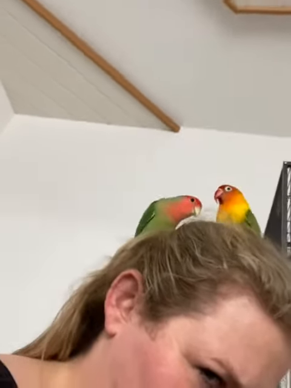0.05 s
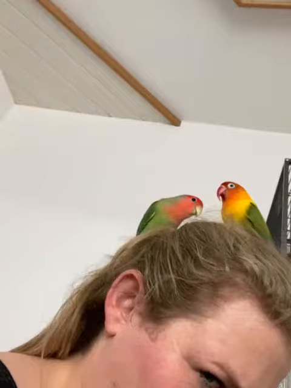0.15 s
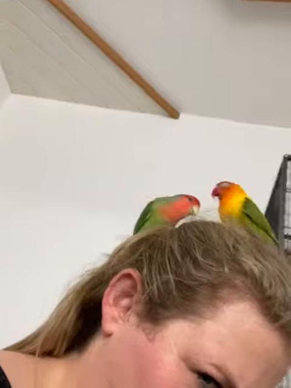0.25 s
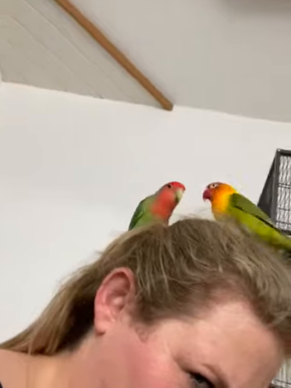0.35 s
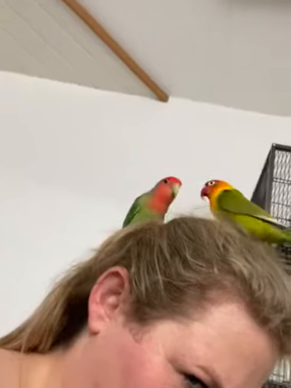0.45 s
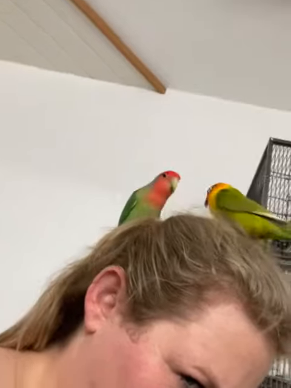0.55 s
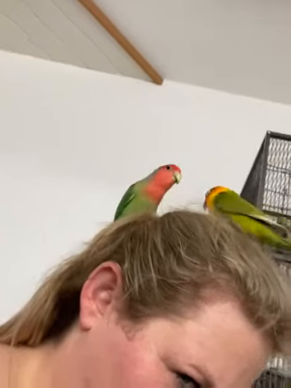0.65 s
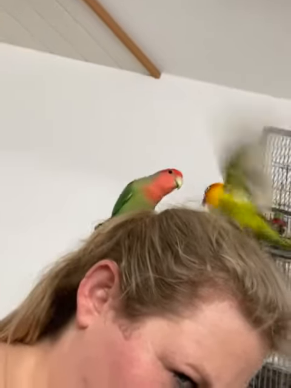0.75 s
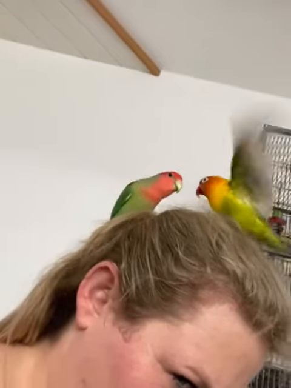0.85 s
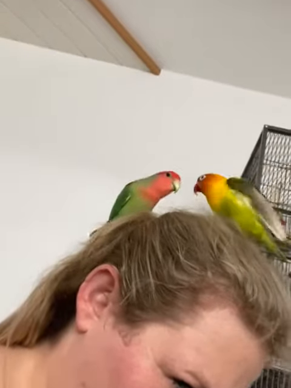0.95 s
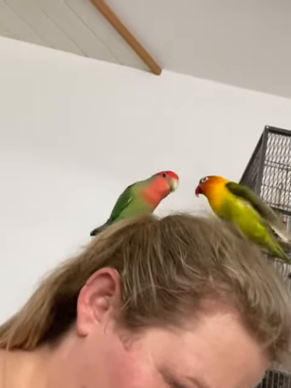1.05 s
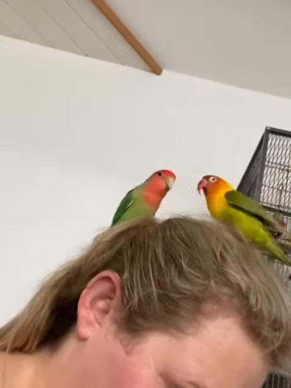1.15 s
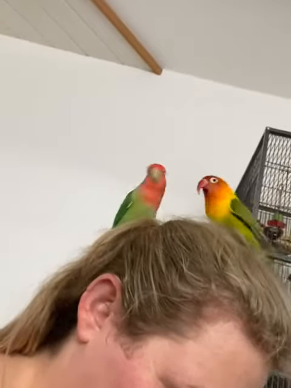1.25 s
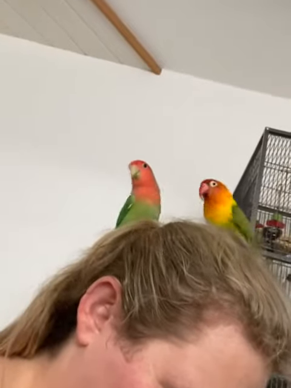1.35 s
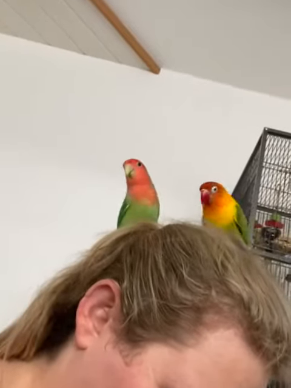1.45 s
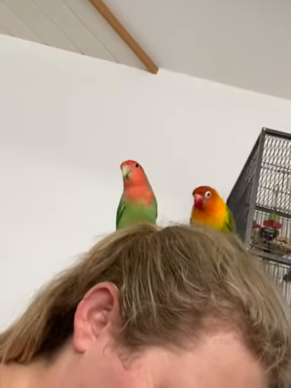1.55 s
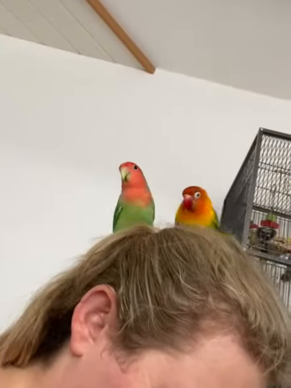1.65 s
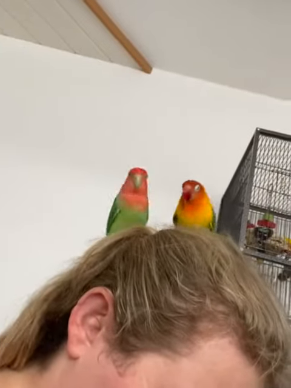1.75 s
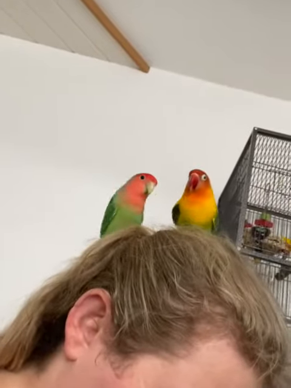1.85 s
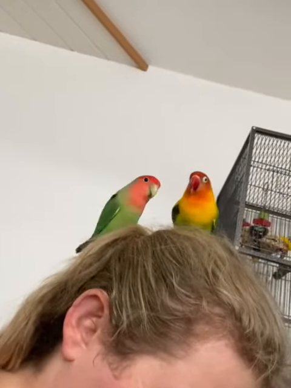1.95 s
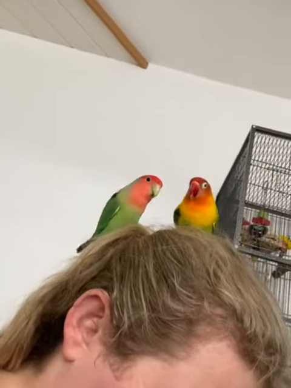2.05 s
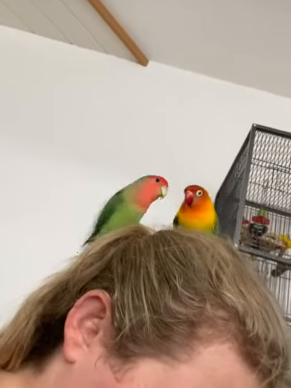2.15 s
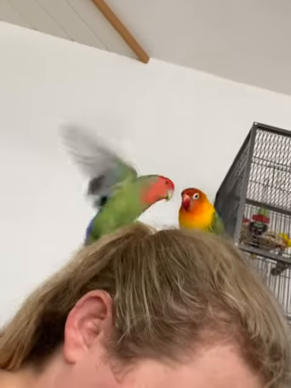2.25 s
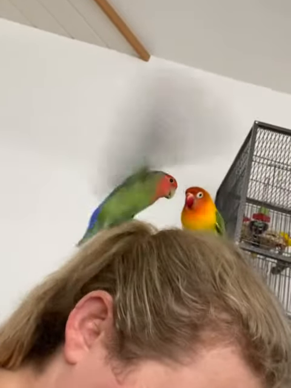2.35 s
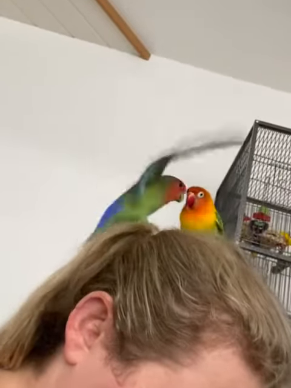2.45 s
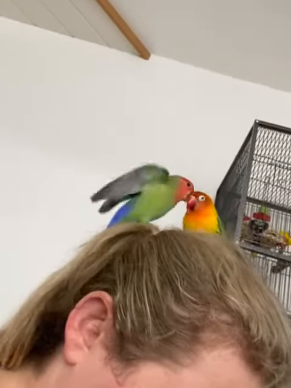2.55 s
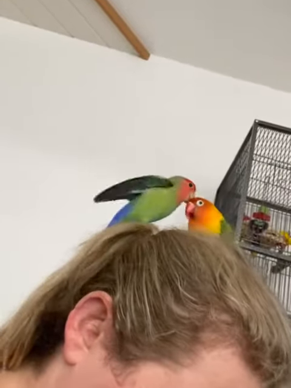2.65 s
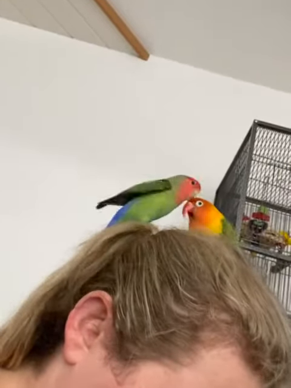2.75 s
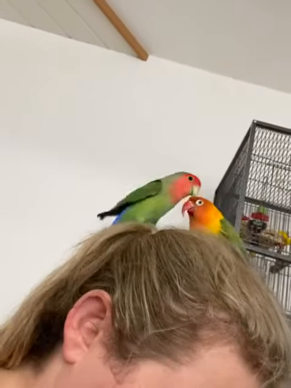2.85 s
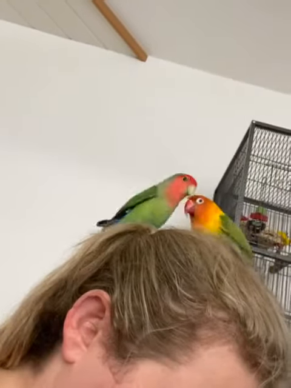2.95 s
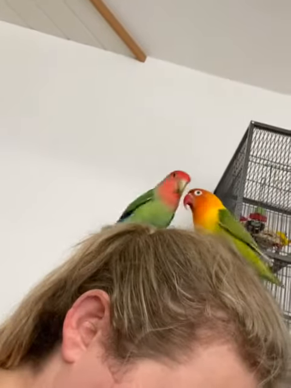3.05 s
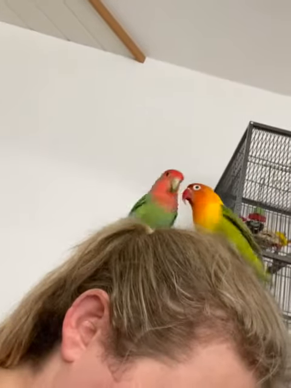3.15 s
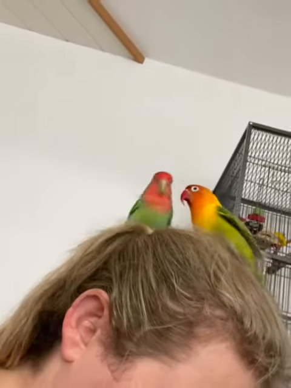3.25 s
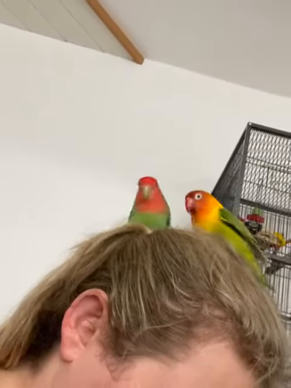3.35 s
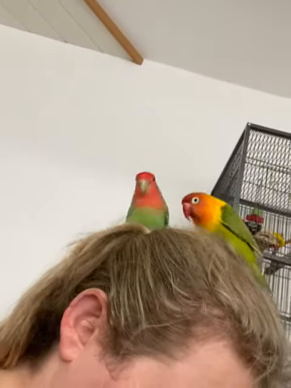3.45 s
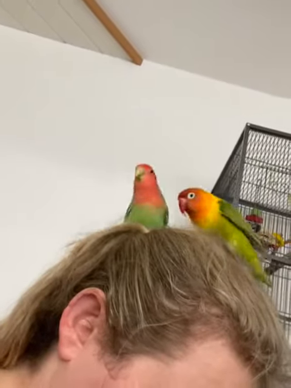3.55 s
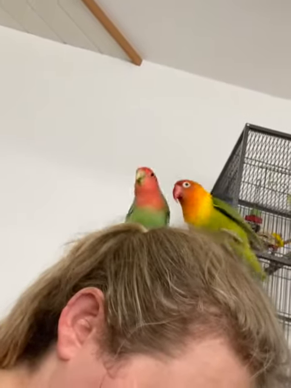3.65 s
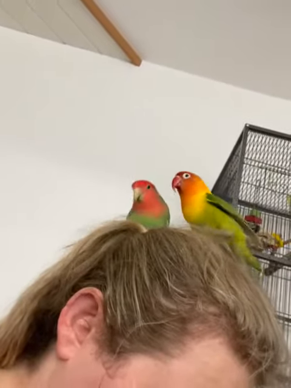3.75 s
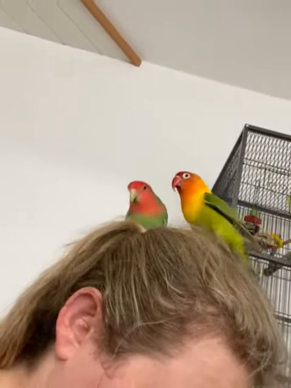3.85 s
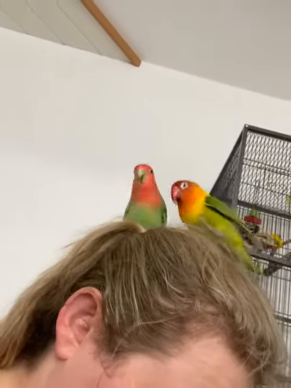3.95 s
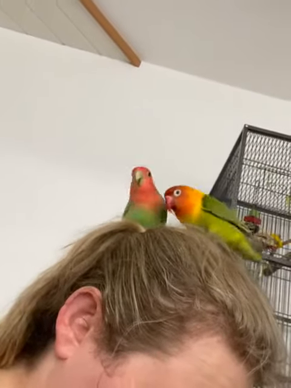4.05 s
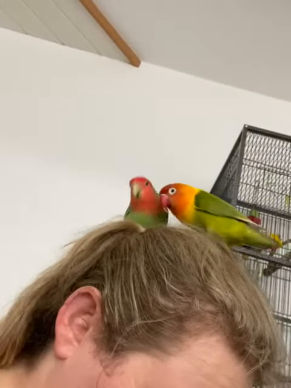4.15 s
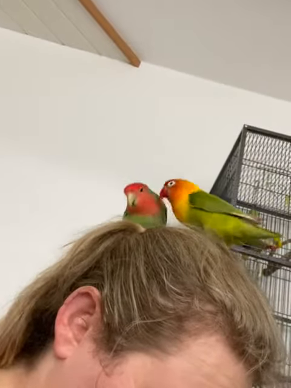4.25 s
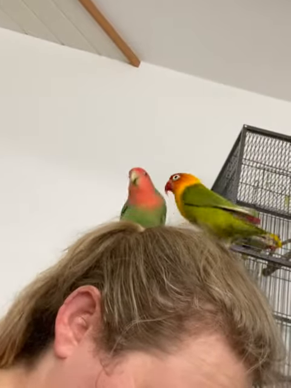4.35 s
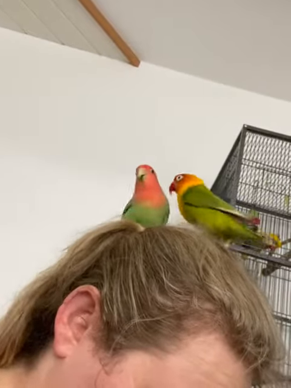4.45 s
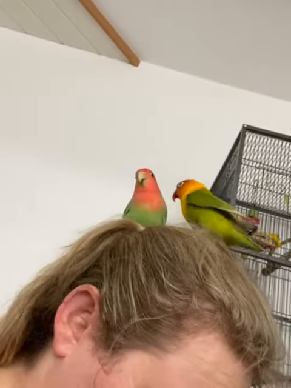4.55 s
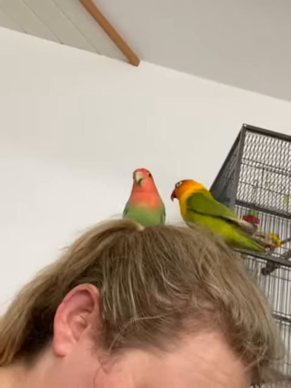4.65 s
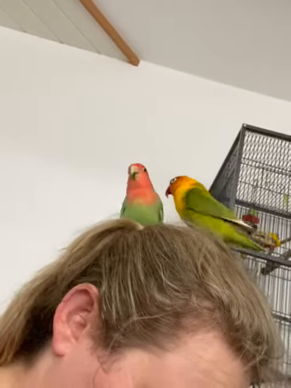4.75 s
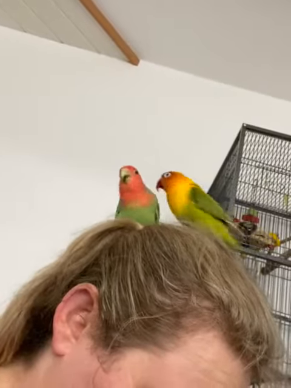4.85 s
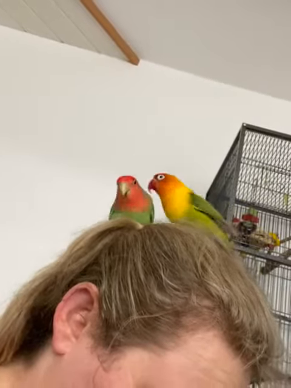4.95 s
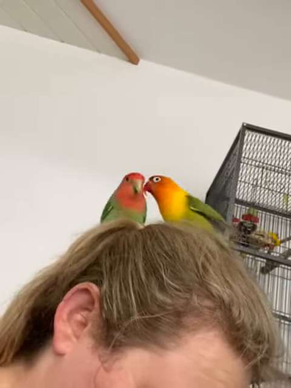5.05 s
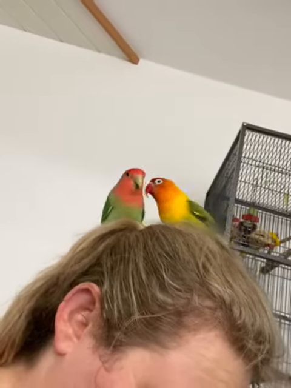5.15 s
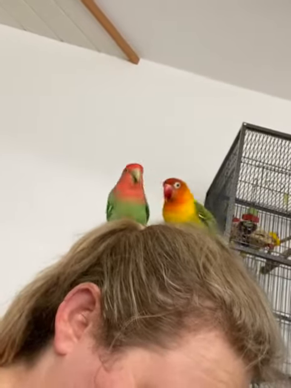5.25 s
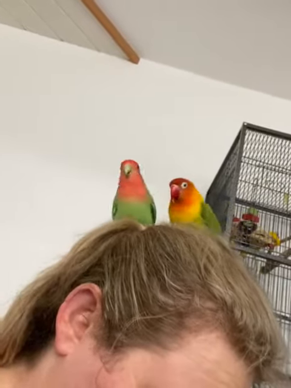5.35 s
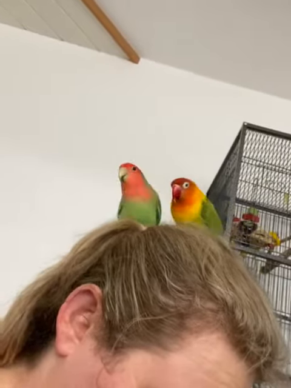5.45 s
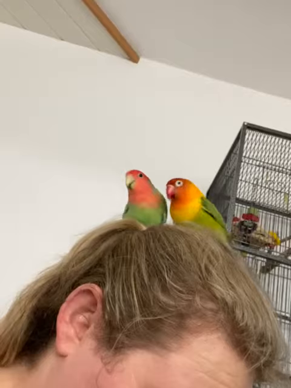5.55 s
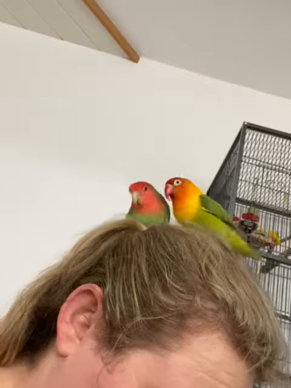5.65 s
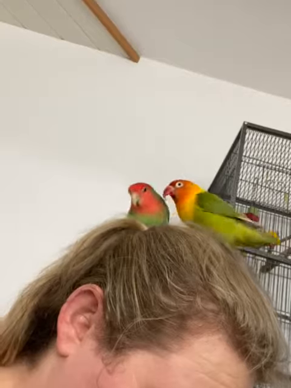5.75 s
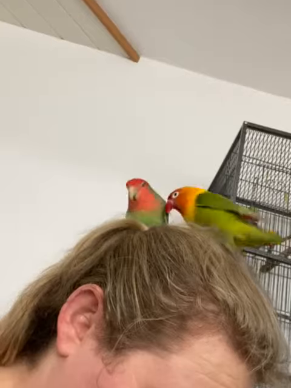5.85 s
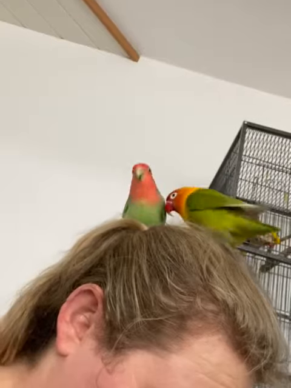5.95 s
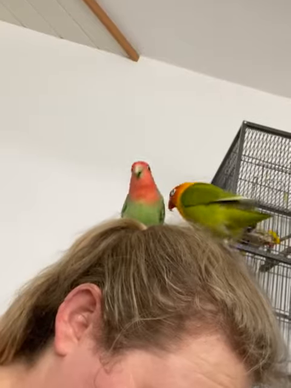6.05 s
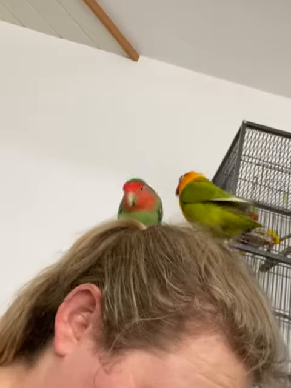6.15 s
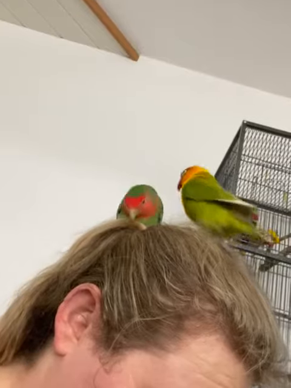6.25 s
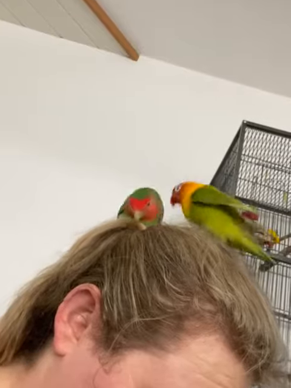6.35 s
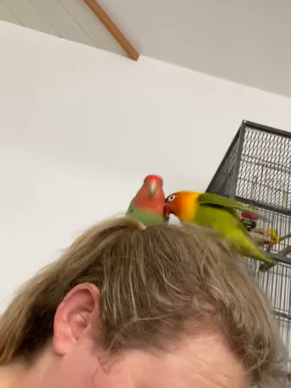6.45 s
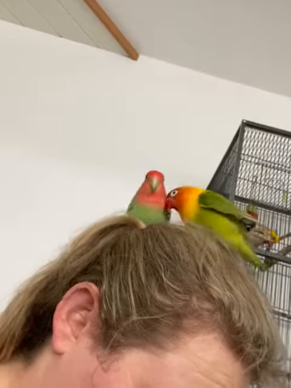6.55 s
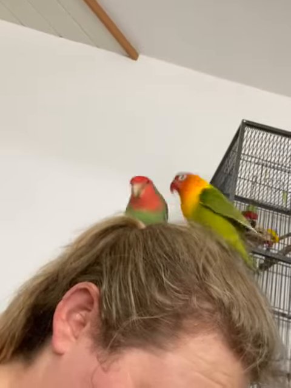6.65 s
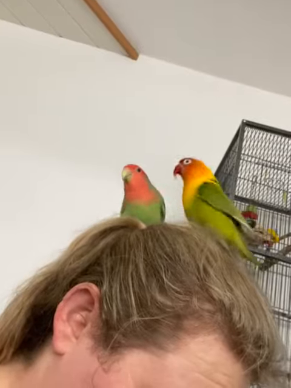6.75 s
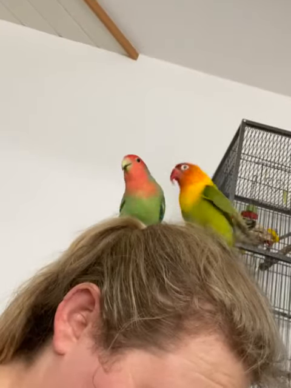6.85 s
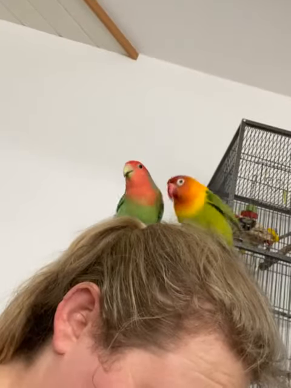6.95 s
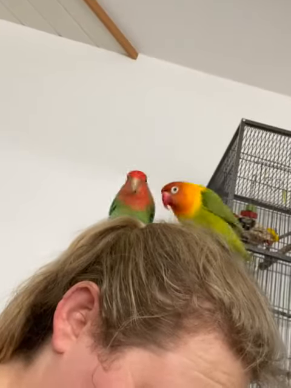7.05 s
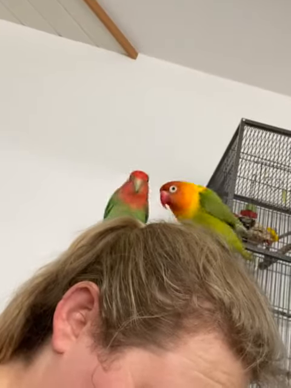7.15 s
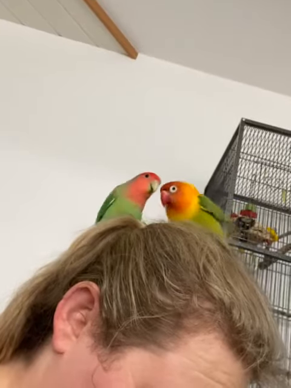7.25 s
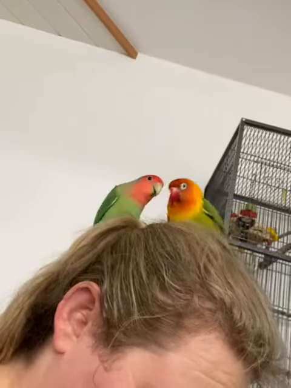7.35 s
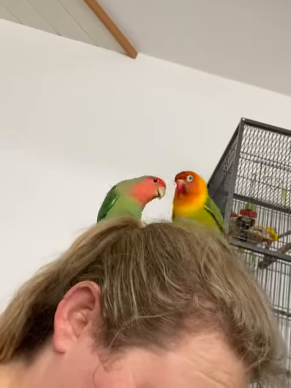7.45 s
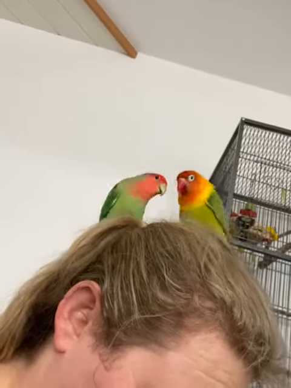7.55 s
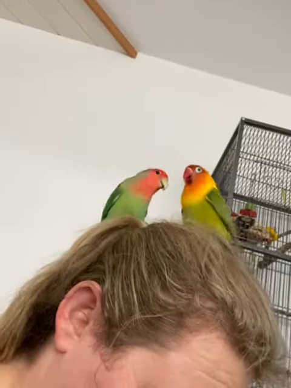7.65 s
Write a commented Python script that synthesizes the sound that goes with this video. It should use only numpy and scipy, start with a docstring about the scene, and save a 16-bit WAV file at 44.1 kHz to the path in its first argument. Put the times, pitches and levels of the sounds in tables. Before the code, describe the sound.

Two lovebirds close by give two very short, shrill, raspy chirps and later one tiny pip, amid faint beak clicking in a live room.

```python
"""Hard-walled room, two small parrots close to a phone microphone.
Two shrill warbled chirps, each led by pips, and a lone pip: harmonics and rasp through a throat filter.
Runs of beak clicks are ticks with gliding pops; wing strokes are grainy filtered noise.
Single echoes and a dense tail ring on; low puffs, hush and a dull distant noise lie beneath."""
import sys
import numpy as np
from scipy import signal
from scipy.fft import rfft, irfft
from scipy.io import wavfile
from scipy.ndimage import uniform_filter1d, minimum_filter1d

SR = 44100
rng = np.random.default_rng(int(sys.argv[2]) if len(sys.argv) > 2 else 0)


def voltage_ratio(decibels):
    """Convert decibels (scalar or array-like) to amplitude ratios, 20 dB per decade."""
    exponent = np.asarray(decibels, float) / 20
    return 10 ** exponent


def int16_out(signal):
    """Quantize to a 16-bit WAV file."""
    q = np.round(np.clip(np.atleast_2d(signal).T, -1, 1) * 32767)
    wavfile.write(sys.argv[1], SR, q.astype(np.int16))


N = 339109

# Response of windpipe and beak, one list per bird. Each row: frequency in Hz, relative gain in dB.
THROATS = [
    [(300, -58.5), (1750, -43.5), (2100, -10), (3500, -4.5), (4400, -4), (5200, 1.5), (6200, -6),
     (7100, -2), (8200, -13), (9000, -16.5), (10200, -17), (11100, -16), (12100, -24.5), (12800, -62)],
    [(300, -57), (1900, -40.5), (2300, -12.5), (3400, -7.5), (4100, -1.5), (5200, -0.5), (6200, -5),
     (7500, -7), (8300, -18), (9200, -20.5), (10200, -22.5), (11300, -19.5), (12100, -29), (12800, -62)],
]
# Warbled chirps, one list per bird. Each row: time in seconds, pitch in Hz, level in dB.
WARBLE_CURVES = [
    [(0.925, 2195, -22.5), (0.9268, 2280, -28), (0.9285, 2590, -9), (0.9302, 2449, -11), (0.932, 2218, -19),
     (0.937, 2224, -14.5), (0.9392, 2454, -11.5), (0.941, 2233, -11.5), (0.944, 2144, -11.5),
     (0.947, 2252, -9.5), (0.9505, 2353, -15), (0.954, 2375, -11), (0.9565, 2433, -15.5)],
    [(2.4277, 2565, -19.5), (2.429, 2456, -8.5), (2.432, 2523, -11), (2.4345, 2382, -15.5),
     (2.4362, 2771, -6.5), (2.438, 2610, -11), (2.4435, 2344, -14.5), (2.446, 2820, -10),
     (2.448, 2623, -12.5), (2.4503, 2479, -10.5), (2.452, 3482, -10.5), (2.4535, 2734, -9),
     (2.4555, 2482, -12.5), (2.4568, 2121, -13.5), (2.4592, 2045, -13.5), (2.46, 2410, -18),
     (2.463, 2300, -11.5), (2.468, 2560, -12.5)],
]
# Voice of each warble. Each row: brightness at -12 dB level in dB per octave, brightness gained by the end
# in dB per octave, settled rasp in dB, rasp gained by the end in dB, send into the room in dB.
WARBLE_VOICES = [(-.5, 2.2, -29, -3, 1), (0.402, 0.1, -27.5, 6.5, 2.03)]
# Short pips. Each row: time in seconds, pitch in Hz, crest level in dB, rasp in dB, send into the room in dB.
PIPS = [(0.9156, 2130, -18, -15, 2), (0.9212, 2240, -27, -12, 1.5), (2.422, 2343, -12, -11, 1.84),
        (5.4452, 2374, -18.5, -17, -1.5)]
# Bird index of each pip.
PIP_BIRDS = [0, 0, 1, 0]
# Beak clicks. Each row: time in seconds, pop peak in dB, pop pitch 0.83 ms in, in Hz, tick level in dB.
CLICKS = [(0.0729, -49, 1700, -56), (0.0762, -46.5, 1070, -48.5), (0.1699, -48.5, 1200, -52),
          (0.1832, -51, 1210, -36), (0.2493, -44, 1273, -52), (0.2614, -41, 1504, -43),
          (0.376, -56, 1810, -47.5), (0.466, -43.5, 1120, -54), (0.5304, -52, 1490, -43.5),
          (0.5554, -46, 1190, -47), (0.6364, -55, 1600, -47), (0.6468, -42.5, 1020, -44),
          (0.7364, -46, 1000, -51), (0.9035, -44, 1730, -39.5), (1.3716, -43.5, 1370, -43),
          (1.486, -49, 1636, -56), (1.5426, -46, 1270, -47.5), (1.6124, -45.5, 1300, -40),
          (1.638, -42, 1100, -45), (1.7365, -43, 1128, -45.5), (1.7461, -46.5, 1184, -48.5),
          (1.8342, -42, 1298, -52), (1.8759, -44.5, 1272, -43), (1.9967, -66.5, 710, -49),
          (2.1366, -46.5, 1127, -50), (2.2558, -47, 1540, -44), (2.705, -49.5, 1330, -54.5),
          (2.862, -48.5, 1520, -45), (2.9786, -54, 1545, -63), (3.0958, -47.5, 1340, -53.5),
          (3.209, -51, 1450, -52.5), (3.2149, -57, 1320, -43), (3.3334, -47.5, 1318, -43.5),
          (3.454, -44, 1224, -46), (3.5606, -47.5, 1140, -43.5), (3.6806, -44, 1410, -41.5),
          (3.7108, -54, 1200, -62.5), (3.7908, -51, 1335, -55), (3.7952, -57.5, 1483, -47),
          (3.817, -43, 1120, -51), (3.9145, -47, 1229, -50), (4.0355, -45, 1296, -46),
          (4.1287, -42.5, 1233, -43), (4.1498, -46, 1450, -40.5), (4.2629, -50, 1338, -63.5),
          (4.3808, -54.5, 1657, -52), (4.5205, -48.5, 965, -70), (4.553, -43, 1218, -42.5),
          (4.645, -41, 1558, -48), (4.7367, -47, 1133, -46), (5.125, -53.5, 1428, -51),
          (5.2465, -50.5, 1440, -47.5), (5.3548, -47, 1330, -44.5), (5.444, -46.5, 908, -39),
          (5.4636, -45, 1250, -56), (5.583, -47.5, 1305, -45), (6.0646, -56, 1600, -68.5),
          (6.1852, -50, 1400, -72), (6.3, -45.5, 1245, -61), (6.303, -53, 1270, -52),
          (6.429, -56, 1620, -55), (6.5387, -56, 1249, -54), (7.0276, -45, 1307, -47),
          (7.0303, -48.5, 1094, -48), (7.1154, -43.5, 1193, -43.5), (7.141, -46.5, 1277, -40),
          (7.2313, -45, 1080, -44.5), (7.329, -48, 1300, -41)]
# Wing and feather strokes. Each row: start in seconds, length in seconds, rustle level in dB.
STROKES = [(0.154, 0.039, -73), (0.248, 0.064, -76), (0.789, 0.065, -61), (0.885, 0.096, -55),
           (1.983, .04, -69), (2.248, 0.056, -54.5), (2.333, 0.044, -49), (2.399, 0.063, -45.5),
           (4.639, 0.066, -78), (7.291, 0.045, -72.5), (7.44, .04, -70), (7.551, 0.045, -71)]
# Feather rustle spectrum. Each row: frequency in Hz, relative level in dB per Hz.
RUSTLE = [(150, -25), (350, -7.5), (900, -3), (1600, -6.5), (3000, -6), (5000, -7.5), (7500, -8.5),
          (11500, -15), (13000, -50)]
# Echoes off the nearest surfaces. Each row: delay in seconds, gain in dB.
ECHOES = [(.0028, -21.5), (.007, -15), (.0095, -18.5), (0.0105, -23.5), (.016, -20.5)]
# Reverberant tail. Each row: frequency in Hz, time to fall 60 dB in seconds, relative level in dB.
ROOM_BANDS = [(300, 0.26, 0.9), (2300, .62, -1.3), (4600, .56, -1.18), (7800, .52, 0), (9000, .46, -0.5),
              (11500, 0.44, -2.5)]
# Moved air at the microphone. Each row: start in seconds, length in seconds, level in dB, centre in Hz.
PUFFS = [(0.528, 0.15, -60, 125), (2.287, .045, -55, 64.96), (2.337, .025, -56.5, 90.3),
         (2.358, .048, -49.5, 70), (2.436, .04, -51, 60), (2.469, 0.04, -55.5, 85),
         (4.662, 0.0794, -65.5, 75.35)]
# Puff spectrum. Each row: multiple of the centre frequency, relative level in dB per Hz.
PUFF_SPECTRUM = [(.35, -28.5), (.65, -3), (1.01, 0.5), (1.7, -7.5), (3.5, -16.5), (7, -23), (13, -48.5)]
# Steady hush spectrum. Each row: frequency in Hz, relative level in dB per Hz.
HUSH = [(15, -56), (25, -26.5), (44, -13.5), (65, -4.5), (205, -5.5), (259, -7.5), (372, -10), (413, -10.5),
        (579, -13), (811, -16.5), (924, -11.5), (1260, -21.5), (2820, -21.5), (8180, -25.5), (11500, -33.5),
        (12400, -40.5), (16100, -72.5), (22000, -120)]
# Dull far-off noise spectrum. Each row: frequency in Hz, relative level in dB per Hz.
DISTANT = [(250, -27.5), (450, 0), (950, -1.5), (1300, -6), (2200, -24)]
# Course of the far-off noise. Each row: time in seconds, level in dB.
DISTANT_LEVEL = [(0, -70), (0.999, -77.5), (2.5, -77.5), (4, -76), (5, -79), (6, -75.5), (7, -79),
                 (7.69, -80)]


def warble(curve, bright_db, brighter_db, rasp_db, hoarser_db):
    """Voice rows of a warble: rasp is strong at the onset and just after fast leaps of pitch."""
    step_s, open_s, close_s, shut_db = 1 / 2000, 0.0015, 0.0027, -22.5
    onset_rasp_db, settle_s = 26, 0.0059
    leap_rasp_db, leap_s = 0.08, 0.005  # dB per octave a second; time it lingers
    first_s, first_hz, first_db = curve[0]
    last_s, last_hz, last_db = curve[-1]
    opening = (first_s - open_s, first_hz, first_db + shut_db)
    closing = (last_s + close_s, last_hz, last_db + shut_db)
    s, hz, db = np.transpose([opening, *curve, closing])
    t = np.arange(s[0], s[-1], step_s)
    hz, db = np.interp(t, s, hz), np.interp(t, s, db)
    octaves_per_s = abs(np.gradient(np.log2(hz), t))
    leap = signal.lfilter([step_s / leap_s], [1, step_s / leap_s - 1], octaves_per_s)
    along = (t - s[0]) / (s[-1] - s[0])
    onset = np.exp(-((t - s[0]) / settle_s) ** 2)
    rasp = rasp_db + hoarser_db * along + leap_rasp_db * leap + onset_rasp_db * onset
    return np.transpose([t, hz, db, bright_db + brighter_db * along, rasp])


def pip(s, hz, db, rasp_db):
    """Voice rows of a pip: quick rise, short hold sagging in level and pitch, quick fall."""
    rise_s, hold_s, fall_s = 0.0014, 0.0016, 0.0028
    gone_db, sag_db, bright_db = -30, -8.5, -2  # brightness in dB per octave
    low_hz = hz * (1 - 0.03)
    steps = [(-rise_s, hz, gone_db), (0, hz, 0),
             (hold_s, low_hz, sag_db), (hold_s + fall_s, low_hz, gone_db)]
    return [(s + after_s, f, db + down_db, bright_db, rasp_db) for after_s, f, down_db in steps]


def chirp(rows, throat):
    """Harmonics of a moving pitch pass the throat; soft parts are duller, rasp fills the gaps."""
    breath_db, dulling, fading_db = -2.5, 0.25, 2
    s, *columns = np.transpose(rows)
    t = np.arange(s[0], s[-1], 1 / SR)
    hz, db, bright, rasp_db = (uniform_filter1d(np.interp(t, s, c), size=16) for c in columns)
    tilt = bright + dulling * (db + 12)
    k = np.arange(2, 12)[:, None] / 2  # harmonic numbers in half steps
    weight_db = read(throat, k * hz) + tilt * np.log2(k / 2)
    # uneven cycles give half-lines, the low ones strongest
    weight_db = weight_db + (rasp_db - fading_db * k) * (k % 1 > 0)
    weight = voltage_ratio(weight_db)
    weight /= np.linalg.norm(weight, axis=0)
    turns = k * np.cumsum(hz) / SR + k ** 2 / 8  # each harmonic starts at its own phase, so the peaks stay soft
    voice = np.sqrt(2) * (weight * np.sin(2 * np.pi * turns)).sum(0)
    breath = voltage_ratio(rasp_db + breath_db) * coloured(throat, len(t))  # turbulent air in the same throat
    return s[0], voltage_ratio(db) * (voice + breath) * signal.windows.tukey(len(t), 0.03)


def click(pop_db, hz, tick_db):
    """A sharp tick of horn on horn, then a pop of the mouth cavity that glides down in pitch."""
    # high pops glide less; pops louder than their tick glide more
    drop = 1.02 - 0.0022 * max(hz - 1340, 0) + 0.05 * max(pop_db - tick_db, 0)
    glide_s, lead_s, rise_s, tick_s = 0.0011, 0.00027, 0.0006, 0.00011
    t = np.arange(500) / SR
    pitch_hz = hz * (glide_s / (t + lead_s)) ** np.clip(drop, 0, 1.3)
    swell = (t / rise_s * np.exp(1 - t / rise_s)) ** 0.9
    pop = swell * np.sin(2 * np.pi * np.cumsum(pitch_hz) / SR)
    tick_hz = 4900 * rng.uniform(0.9, 1.2)
    tick = t / tick_s * np.exp(1 - t / tick_s) * np.sin(2 * np.pi * tick_hz * t)
    # steadier pops tick again one cycle later
    bounce = np.clip(1.2 - drop, 0, 1) * np.roll(tick, round(SR / hz))
    return voltage_ratio(pop_db) * pop - voltage_ratio(tick_db) * (tick + bounce)


def wings():
    """Feathers rustle on each stroke, their barbs slipping unevenly."""
    t = np.arange(N) / SR
    level = np.zeros(N)
    for s, length_s, db in STROKES:
        level += voltage_ratio(db) * abs(np.sin(np.pi * np.clip((t - s) / length_s, 0, 1))) ** 0.55
    grain = voltage_ratio(2.8 * evened(uniform_filter1d(rng.standard_normal(N), size=150)))
    return level * evened(grain * noise(RUSTLE, 1.5))


def room(x):
    """A few single echoes, then dense taps of random sign, each band dying at its own speed."""
    gap_s, build_s, tail_db = 0.002, 0.012, -10
    count = (SR - 1) // 20
    taps = np.zeros(SR)
    places = np.arange(0, SR - 20, 20) + rng.integers(0, 20, count)
    taps[places] = rng.choice([-1., 1.], count)
    hz, t, bands = signal.stft(taps, SR, nperseg=256)
    f, t60_s, db = np.transpose(ROOM_BANDS)
    decay_db = 60 * t / np.interp(hz, f, t60_s)[:, None]
    bands *= voltage_ratio(np.interp(hz, f, db)[:, None] - decay_db)
    tail = signal.istft(bands, SR, nperseg=256)[1]
    tail *= np.clip((np.arange(len(tail)) / SR - gap_s) / build_s, 0, 1)
    tail *= voltage_ratio(tail_db) / np.linalg.norm(tail)
    for s, db in ECHOES:
        add(tail, s, voltage_ratio([db]))
    return signal.fftconvolve(x, tail)[:N]


def puffs():
    """Moved air buffets the microphone: short arches of low noise."""
    out = np.zeros(N)
    for s, length_s, db, hz in PUFFS:
        arch = np.sin(np.pi * np.arange(0, length_s, 1 / SR) / length_s) ** 0.55
        push = evened(coloured(PUFF_SPECTRUM, 16384, hz)[:len(arch)])
        add(out, s, voltage_ratio(db) * arch * push)
    return out


def house():
    """Steady hush of the room and microphone, and a dull noise that comes and goes."""
    distant_db = np.interp(np.arange(N) / SR, *np.transpose(DISTANT_LEVEL))
    return voltage_ratio(-66.5) * noise(HUSH, 0.8) + voltage_ratio(distant_db) * noise(DISTANT, 0.56)


def noise(spectrum, patchy_db):
    """Noise of a given spectrum with short random patches, rms 1."""
    real, imag, patches = rng.standard_normal((N // 512 + 5, 1025, 3)).T
    patches = uniform_filter1d(patches, size=24, axis=0)  # across frequency
    patches = evened(uniform_filter1d(patches, size=5, axis=1))  # across time
    db = read(spectrum, np.fft.rfftfreq(2048, 1 / SR))[:, None] + patchy_db * patches
    return evened(signal.istft((real + 1j * imag) * voltage_ratio(db), nperseg=2048, noverlap=1536)[1][:N])


def coloured(spectrum, length, unit_hz=1):
    """A short stretch of noise with a given spectrum, rms 1."""
    gain = voltage_ratio(read(spectrum, np.fft.rfftfreq(length, 1 / SR) / unit_hz))
    return evened(irfft(rfft(rng.standard_normal(length)) * gain, length))


def evened(x):
    """Scales to rms 1."""
    return x / np.sqrt(np.mean(x ** 2) + 1e-20)


def read(points, hz):
    """Reads a spectrum on a log-frequency axis."""
    f, value = np.transpose(points)
    return np.interp(np.log(hz + 1e-3), np.log(f + 1e-3), value)


def add(mix, s, sound):
    """Adds a sound at time s in seconds."""
    part = mix[round(s * SR):][:len(sound)]
    part += sound[:len(part)]


def scene():
    """Birds in the room, air on the microphone, the house behind."""
    direct = wings()
    for s, pop_db, hz, tick_db in CLICKS:
        add(direct, s - 0.0003, click(pop_db, hz, tick_db))
    sent = direct.copy()
    calls = []
    for (*settings, send_db), bird in zip(PIPS, PIP_BIRDS):
        calls.append((pip(*settings), bird, send_db))
    for bird, (curve, (*settings, send_db)) in enumerate(zip(WARBLE_CURVES, WARBLE_VOICES)):
        calls.append((warble(curve, *settings), bird, send_db))
    for rows, bird, send_db in calls:
        s, sound = chirp(rows, THROATS[bird])
        add(direct, s, sound)
        add(sent, s, voltage_ratio(send_db) * sound)
    return (direct + room(sent) + puffs() + house())[None]


def top_cut(x):
    """Nothing passes above the cut-off."""
    return signal.sosfilt(signal.butter(12, 12900, fs=SR, output="sos"), x)


def record(dry):
    """The microphone cuts the deepest bass; a fast limiter holds the peaks."""
    ceiling = 0.84
    cut = signal.sosfilt(signal.butter(6, 42, "high", fs=SR, output="sos"), dry)
    peak = -minimum_filter1d(-abs(cut), size=89, axis=1)
    gain = np.minimum(1, ceiling / (peak + 1e-9))
    held = cut * uniform_filter1d(gain, size=45, axis=1)
    return top_cut(held)


dry = scene()
out = record(dry)
int16_out(out)
```